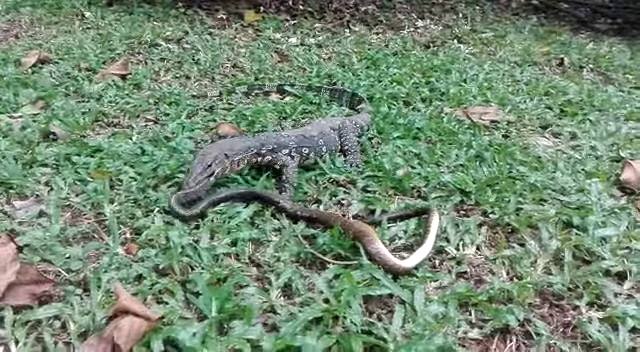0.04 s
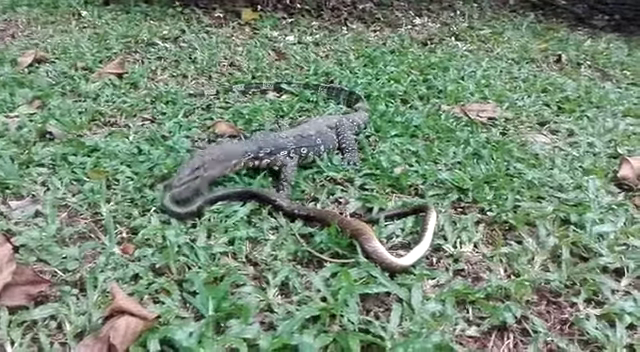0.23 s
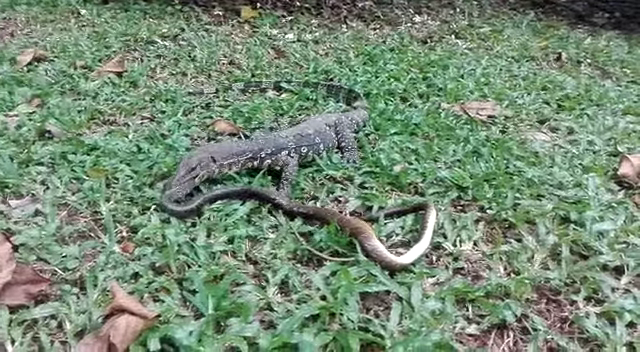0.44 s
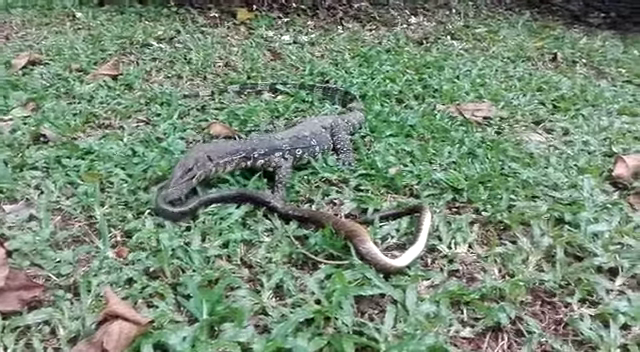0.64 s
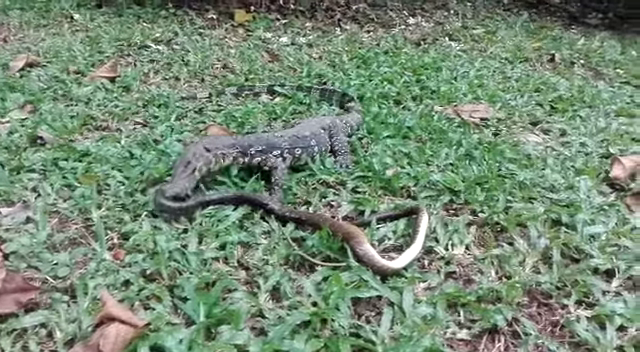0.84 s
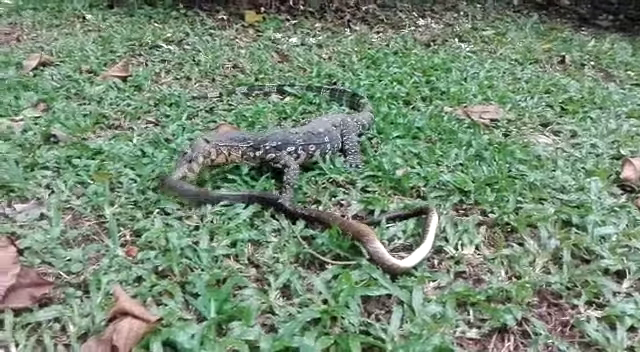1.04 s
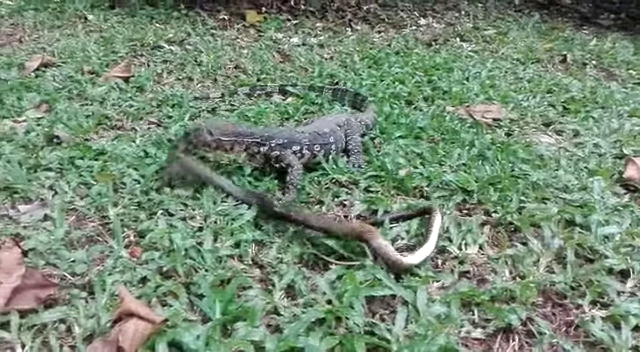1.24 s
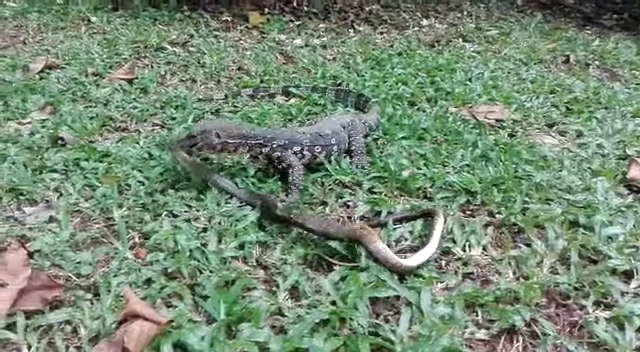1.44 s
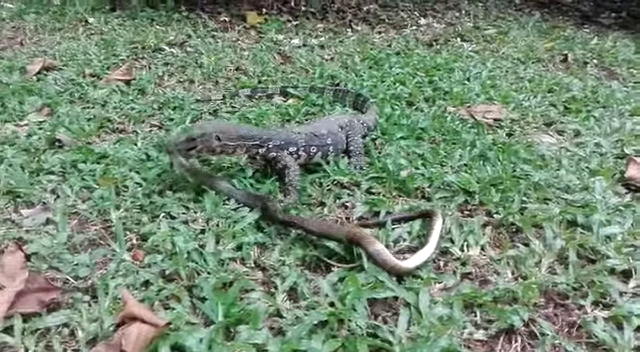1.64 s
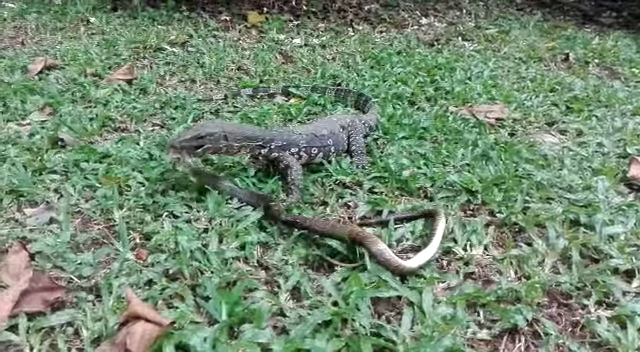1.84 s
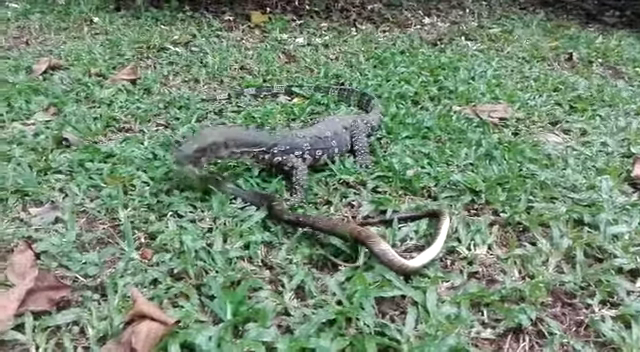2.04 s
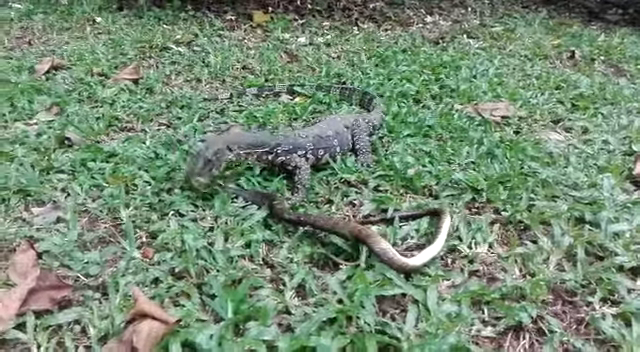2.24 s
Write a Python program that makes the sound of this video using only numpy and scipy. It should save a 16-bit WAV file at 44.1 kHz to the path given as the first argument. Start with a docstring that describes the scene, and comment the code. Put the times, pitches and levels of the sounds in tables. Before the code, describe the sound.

A loud hiss like escaping air, probably from a large lizard facing a snake, opens at once and fades within a second; then faint grass rustle, thin insect buzz, tiny peeps and low rumble, outdoors, handheld microphone.

```python
"""A cicada-like insect buzzes near 10 kHz outdoors on grass, over leaf hiss and the rumble of far traffic.
A valve somewhere near then lets out compressed air: noise that opens at once and sags, treble first.
Far birds peep as short wavering tones. Dragged grass is a rain of tiny random clicks, and its snaps are
short fading noises. Wind buffets on the microphone are swells of low noise."""
import sys
import numpy as np
from scipy import signal
from scipy.fft import rfft, irfft, next_fast_len
from scipy.io import wavfile
from scipy.ndimage import uniform_filter1d, map_coordinates

SR = 44100
rng = np.random.default_rng(int(sys.argv[2]) if len(sys.argv) > 2 else 0)


def volts_from_decibels(level):
    """Turn decibel levels (scalar or array-like) into linear amplitude factors."""
    exponent = np.asarray(level, float) / 20
    return 10 ** exponent


def dump_mix(stems):
    """Bounce the given channels to the path in sys.argv[1] as a 16-bit WAV at rate SR."""
    frames = np.atleast_2d(stems).T  # one column per channel
    limited = np.clip(frames, -1, 1)  # hard clip at full scale
    pcm = np.round(limited * 32767).astype(np.int16)
    wavfile.write(sys.argv[1], SR, pcm)


N = 101429  # length in samples

# Air pressure behind the burst; only its fall below the peak is used: start_s, level_db
AIR_PRESSURE = [(.226, -47), (.232, -37.5), (.24, -33.5), (.27, -31.5), (.3, -30.5), (.4, -32.5),
                (.5, -35.5), (.6, -40.5), (.72, -47), (.85, -53.5), (.95, -59.5), (1.05, -70), (1.2, -76)]
# Colour of the air jet at full pressure: pitch_hz, level_db (per Hz, relative)
JET_COLOUR = [(410, -49), (700, -21), (1000, -10), (1300, -4), (1500, -4.5), (1800, -3), (2100, -6),
              (2740, -5), (3400, -7), (4260, -11), (8630, -14), (11000, -22), (14300, -33)]
# How a band falls as pressure is lost: pitch_hz, fall_db_per_db, extra_fall_db_per_db_squared
PRESSURE_RESPONSE = [(800, .9, .001), (1400, .97, .001), (2000, .97, .001), (3000, 1.15, .004),
                     (6500, 1.15, .011), (7900, 1.2, .015), (8700, 1.6, .038), (13000, 1.8, .035)]
# Narrow bands of the jet lifted by echoes of it nearby: pitch_hz, width_hz, lift_db
JET_ECHO_PEAKS = [(1309, 20, 5), (1517, 20, 8), (1836, 30, 4), (1919, 20, 4), (2449, 30, 4), (2719, 20, 4),
                  (2929, 15, 3), (3257, 15, 5)]
# Low roar of the outflow: start_s, low_level_db (40-330 Hz), mid_level_db (400-750 Hz)
ROAR_LEVELS = [(.226, -48, -72), (.258, -41, -57), (.344, -37, -53), (.42, -39, -55), (.53, -47, -57),
               (.72, -60, -59), (.812, -68, -66), (.9, -80, -80)]
# Colours of the two parts of the roar: pitch_hz, level_db (relative)
ROAR_LOW_COLOUR = [(18, -33), (30, -3), (103, 0), (216, -11), (271, -9), (350, -17), (460, -47),
                   (770, -120)]
ROAR_MID_COLOUR = [(210, -36), (350, -5), (450, -4), (576, -8), (750, -4), (900, -30), (1760, -120)]
# The near insect's buzz: start_s, level_db, pulse_rate_hz
INSECT_BUZZ = [(0, -70.5, 165), (.2, -70, 172), (.73, -72, 146), (1.1, -70, 144), (1.4, -68.5, 143.5),
               (1.415, -76, 143.5), (1.555, -95, 143), (1.57, -71.5, 130), (1.75, -68, 143.2),
               (2.0, -64, 143.2), (2.3, -68.5, 156)]
# Colour of the far insects: pitch_hz, level_db (relative)
CHORUS_COLOUR = [(8000, -40), (8500, -4), (9000, 7.5), (10000, 8), (10700, -26), (11300, -40)]
# Loudness of the far insects: start_s, level_db
CHORUS_LEVELS = [(0, -71), (.25, -72), (.7, -80), (1.4, -80), (1.5, -74), (1.9, -70), (2.3, -70)]
# Far bird peeps: start_s, length_s, pitch_hz, level_db (before a shared 5 dB lift), waver_hz
BIRD_PEEPS = [(.036, 0.041, 760, -63, 4), (.066, .04, 760, -74, 5), (.03, .21, 2950, -84, 12),
              (1.405, .03, 3550, -78, 60), (1.68, .42, 3375, -77, 15), (1.79, .11, 3390, -75, 25),
              (1.85, .04, 3360, -65, 10), (1.96, .09, 2006, -69, 15), (2.06, .035, 2005, -74, 15),
              (2.22, .025, 2750, -80, 150)]
# Grass being dragged over: start_s, level_db
DRAG_LEVELS = [(0.98, -80), (0.996, -79.5), (1.03, -66.5), (1.084, -64.5), (1.102, -68), (1.204, -66.5),
               (1.32, -90)]
# Colour of the dragged grass: pitch_hz, level_db (relative)
DRAG_COLOUR = [(3000, -24), (7000, -9), (10500, -15), (12000, 1), (14000, -2), (16000, -15)]
# Single stems snapping: start_s, level_db (before a shared 7 dB cut)
STEM_SNAPS = [(0.664, -54), (1.0178, -57), (1.1896, -61), (1.689, -57), (1.932, -51), (2.055, -57)]
# Colour of the snaps: pitch_hz, level_db (relative)
SNAP_COLOUR = [(1500, -20), (4000, -6), (8000, 4), (13000, 1), (16000, -1)]
# Colour of the far traffic: pitch_hz, level_db (relative)
RUMBLE_COLOUR = [(12, -43), (20, -12), (30, -2), (59, 0), (76, -5), (107, -6), (161, -13), (250, -19),
                 (321, -22), (450, -35), (580, -65), (990, -120)]
# Wind buffets on the microphone: start_s, length_s, level_db (at the top of the swell)
WIND_BUFFETS = [(.1, .12, -55), (.9, .19, -47), (1.85, .1, -56), (2.13, .07, -48)]
# Colour of the buffets: pitch_hz, level_db (relative)
BUFFET_COLOUR = [(12, -30), (25, -4), (50, 0), (80, -6), (140, -20), (250, -50)]
# Colour of the leaf hiss: pitch_hz, level_db (per Hz, relative)
LEAF_COLOUR = [(210, -37), (350, -14), (420, -4), (500, -11), (700, -10), (1200, -5), (2000, -9),
               (3000, -12), (5000, -17), (7900, -18), (11000, -17), (14500, -19)]
# Loudness of the leaf hiss: start_s, level_db
LEAF_LEVELS = [(0, -70.5), (.9, -68.5), (1.6, -68.5), (1.9, -70), (2.3, -70.5)]

OPEN_S, OPENING_S = .226, .006  # when the valve opens, and how long it takes
JET_DB = -25.8  # jet level before the pressure falls
PULSE_TOP_HZ, PULSE_DROP_HZ, PULSE_S = 10600, 1400, .0047  # start pitch, slide down, length
PULSE_JITTER = .03  # timing scatter, as a share of the gap between pulses
PULSE_SCATTER_DB, PULSE_RASP = 1.8, .35  # uneven pulse levels, roughness within a pulse
WAVER_PER_S, FLUTTER_PER_S, FLUTTER = 80, 150, .4  # speed of pitch and level changes, flutter depth
DRAG_GRAINS_PER_S, DRAG_SIZES_DB = 2800, 1
SNAP_FADE_S = .002


def unit(x):
    """Scales a sound to an rms of 1."""
    return x / np.sqrt(np.mean(x ** 2) + 1e-20)


def along(points, hz):
    """Reads a (Hz, value) curve with pitch on a log axis."""
    f, v = np.transpose(points)
    return np.interp(np.log(hz + 1), np.log(f + 1), v)


def curves(rows):
    """Gives one value per sample for each column after the time."""
    s, *cols = np.transpose(rows)
    return [np.interp(np.arange(N) / SR, s, c) for c in cols]


def wobble(rate):
    """A smooth random curve through rate knots a second."""
    knots = rng.standard_normal(500)
    return map_coordinates(knots, [np.arange(N) * rate / SR])


def filtered(x, response):
    """Multiplies each frequency in a sound by a gain."""
    m = next_fast_len(N + 8192)
    gain = response(np.fft.rfftfreq(m, 1 / SR))
    return irfft(rfft(x, m) * gain, m)[..., :N]


def rush(colour, patchy_db):
    """Coloured noise of rms 1, with random louder and softer patches in time and pitch."""
    z = signal.stft(rng.standard_normal(N), nperseg=512)[2]
    field = uniform_filter1d(rng.standard_normal(z.shape), size=5, axis=0)
    field = uniform_filter1d(field, size=8, axis=1)
    noise = signal.istft(z * volts_from_decibels(patchy_db * unit(field)), nperseg=512)[1][:N]
    return unit(filtered(noise, lambda hz: volts_from_decibels(along(colour, hz))))


def jet_echo_peaks(hz):
    """Echoes of the jet nearby lift a few narrow bands of it."""
    return volts_from_decibels(sum(db / (1 + (2 * (hz - c) / w) ** 2) for c, w, db in JET_ECHO_PEAKS))


def jet():
    """Turbulent air: every band weakens with the one pressure, the higher the steeper."""
    pressure_db = curves(AIR_PRESSURE)[0]
    lost_db = pressure_db.max() - pressure_db
    full = unit(filtered(rush(JET_COLOUR, patchy_db=1.2), jet_echo_peaks))
    pitch_hz, fall, extra_fall = np.transpose(PRESSURE_RESPONSE)
    out = np.zeros(N)
    for sixth in np.arange(48, 88):  # overlapping bands, a sixth of an octave apart
        band = filtered(full, lambda hz: np.clip(1 - abs(6 * np.log2(hz + 1) - sixth), 0, 1))
        center_hz = 2 ** (sixth / 6)
        k = along(np.c_[pitch_hz, fall], center_hz)
        q = along(np.c_[pitch_hz, extra_fall], center_hz)
        out += band * volts_from_decibels(-k * lost_db - q * lost_db ** 2)
    # a last fade to silence after the final pressure point
    fade = np.clip((AIR_PRESSURE[-1][0] + 0.36 - np.arange(N) / SR) / 0.26, 0, 1)
    return volts_from_decibels(JET_DB) * fade * out


def roar():
    """The outflow's low roar: two bands of noise, each with its own level curve."""
    ending = [(ROAR_LEVELS[-1][0] + .1, -90, -100)]
    low_db, mid_db = curves(list(ROAR_LEVELS) + ending)
    low = volts_from_decibels(low_db) * rush(ROAR_LOW_COLOUR, patchy_db=1.2)
    mid = volts_from_decibels(mid_db) * rush(ROAR_MID_COLOUR, patchy_db=1.2)
    return low + mid


def air_burst():
    """The valve opens within milliseconds and lets out the jet and its roar."""
    opening = np.clip((np.arange(N) / SR - OPEN_S) / OPENING_S, 0, 1)
    return opening * (jet() + roar())


def insect():
    """A train of short raspy pulses, each sliding down in pitch."""
    level_db, rate = curves(INSECT_BUZZ)
    starts = np.flatnonzero(np.diff(np.floor(np.cumsum(rate) / SR)))
    pitch_draw, level_draw, time_draw = rng.standard_normal((3, len(starts)))
    t = np.arange(300) / SR
    u = np.clip(t / PULSE_S, 0, 1)  # progress through one pulse
    cycles = (PULSE_TOP_HZ + 50 * pitch_draw[:, None]) * t - PULSE_DROP_HZ * t * u / 2
    rasp = unit(uniform_filter1d(rng.standard_normal((len(starts), len(t))), size=40, axis=1))
    pulses = np.sin(np.pi * u) ** 2 * np.sin(2 * np.pi * cycles) * (1 + PULSE_RASP * rasp)
    pulses = pulses * volts_from_decibels(PULSE_SCATTER_DB * level_draw[:, None])
    at = (starts + PULSE_JITTER * SR / rate[starts] * time_draw).astype(int).clip(0)
    places = at[:, None] + np.arange(len(t))
    train = np.bincount(places.ravel(), pulses.ravel(), N + 600)[:N]
    return volts_from_decibels(level_db) * unit(train)


def far_insects():
    """Many far insects blend into a narrow band of noise."""
    return volts_from_decibels(curves(CHORUS_LEVELS)[0]) * rush(CHORUS_COLOUR, patchy_db=1)


def birds():
    """Each peep is a wavering, fluttering tone under a soft swell."""
    t, out = np.arange(N) / SR, np.zeros(N)
    for s, length, hz, db, waver_hz in BIRD_PEEPS:
        phase = 2 * np.pi * np.cumsum(hz + waver_hz * wobble(WAVER_PER_S)) / SR
        swell = np.sin(np.pi * np.clip((t - s) / length, 0, 1)) ** .6
        flutter = 1 + FLUTTER * wobble(FLUTTER_PER_S)
        out += volts_from_decibels(db + 5) * flutter * swell * np.sin(phase)
    return out


def dragged_grass():
    """A body drags over the blades, making dense tiny grains of random size."""
    before = [(DRAG_LEVELS[0][0] - .03, -110)]
    after = [(DRAG_LEVELS[-1][0] + .05, -110)]
    level_db = curves(before + list(DRAG_LEVELS) + after)[0]
    hits = (rng.random(N) < DRAG_GRAINS_PER_S / SR) * rng.standard_normal(N)
    hits = hits * volts_from_decibels(DRAG_SIZES_DB * rng.exponential(size=N))
    return volts_from_decibels(level_db) * unit(filtered(hits, lambda hz: volts_from_decibels(along(DRAG_COLOUR, hz))))


def stem_snaps():
    """Each snapping stem is bright noise that starts at once and dies away."""
    t, level = np.arange(N) / SR, np.zeros(N)
    for s, db in STEM_SNAPS:
        level += volts_from_decibels(db - 7) * (t >= s) * np.exp(-np.clip(t - s, 0, 1) / SNAP_FADE_S)
    return level * rush(SNAP_COLOUR, patchy_db=1)


def wind():
    """Wind buffets the microphone: low noise that swells and sinks."""
    t, level = np.arange(N) / SR, np.zeros(N)
    for s, length, db in WIND_BUFFETS:
        level += volts_from_decibels(db) * np.sin(np.pi * np.clip((t - s) / length, 0, 1))
    return level * rush(BUFFET_COLOUR, patchy_db=1)


def traffic():
    """Far traffic is low noise whose level drifts a little around -54 dB."""
    return volts_from_decibels(-54 + 1.2 * wobble(8.96)) * rush(RUMBLE_COLOUR, patchy_db=2.0)


def leaves():
    """Leaves give a soft, wide hiss of noise."""
    return volts_from_decibels(curves(LEAF_LEVELS)[0]) * rush(LEAF_COLOUR, patchy_db=-1.0)


def scene():
    """All sources added together at one microphone."""
    near = air_burst() + insect() + dragged_grass() + stem_snaps()
    far = far_insects() + birds() + wind() + traffic() + leaves()
    return (near + far)[None]


def low_pass(x):
    """Removes everything above the highest recorded frequency."""
    return signal.sosfilt(signal.butter(12, 14770, fs=SR, output="sos"), x)


def record(dry):
    """The camera's band limit removes everything from 14320 Hz up."""
    mix = filtered(dry, lambda hz: hz < 14320)
    return low_pass(mix)


dry = scene()
out = record(dry)
dump_mix(out)
```